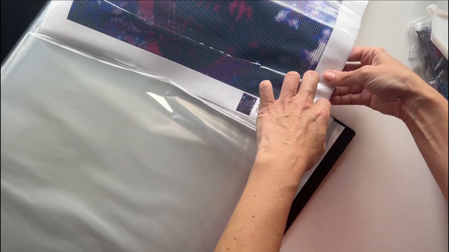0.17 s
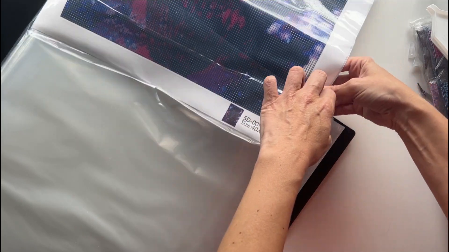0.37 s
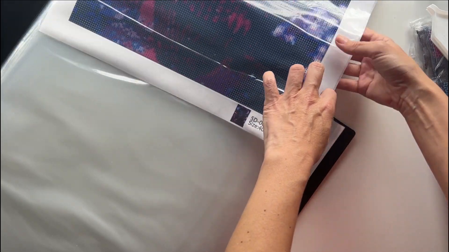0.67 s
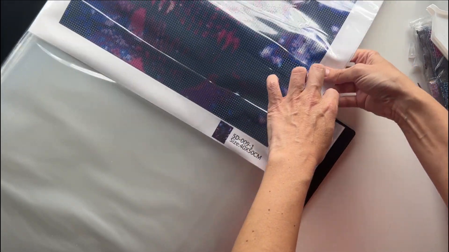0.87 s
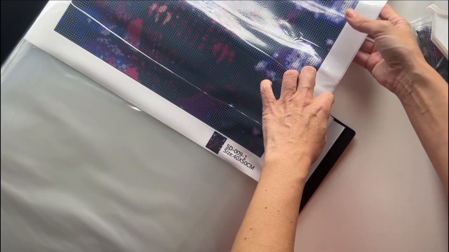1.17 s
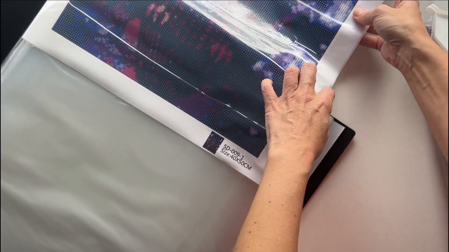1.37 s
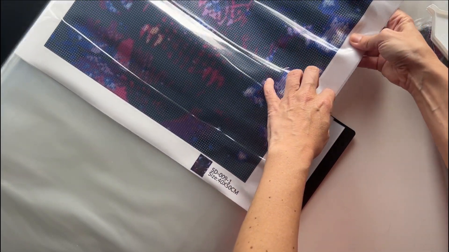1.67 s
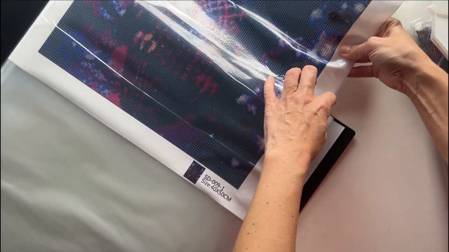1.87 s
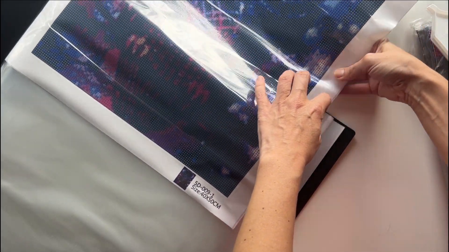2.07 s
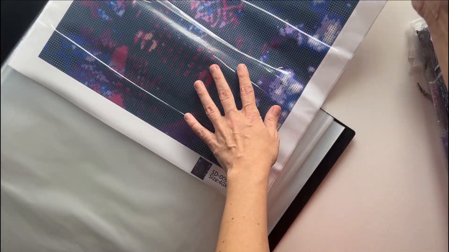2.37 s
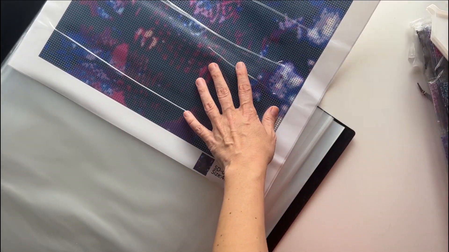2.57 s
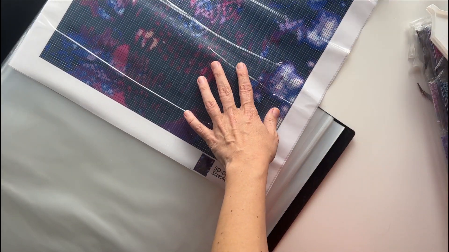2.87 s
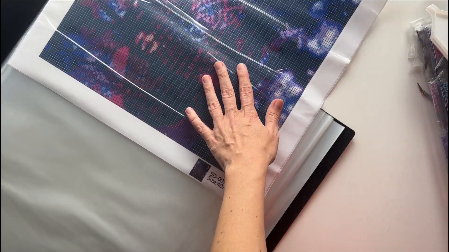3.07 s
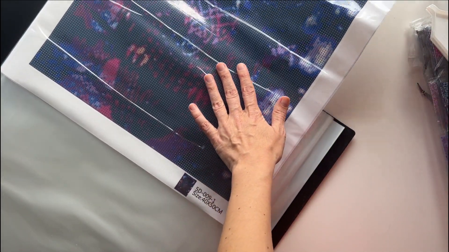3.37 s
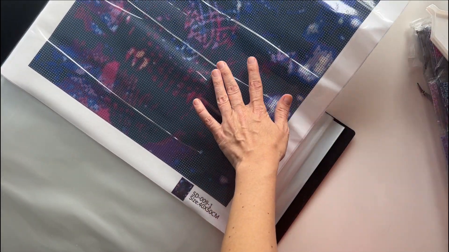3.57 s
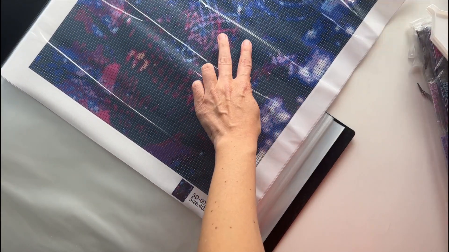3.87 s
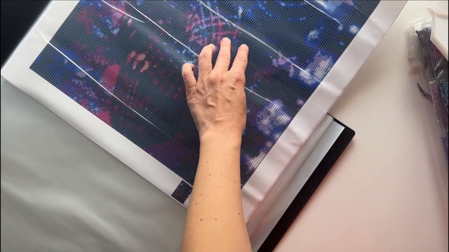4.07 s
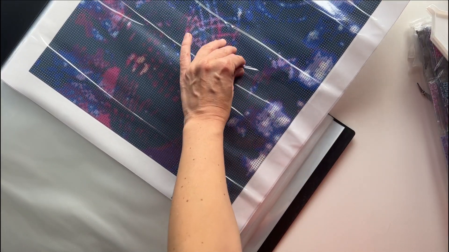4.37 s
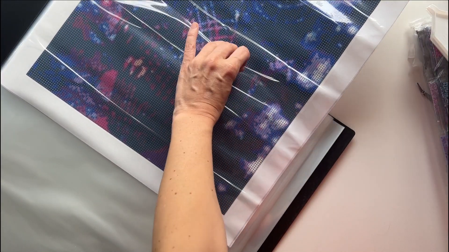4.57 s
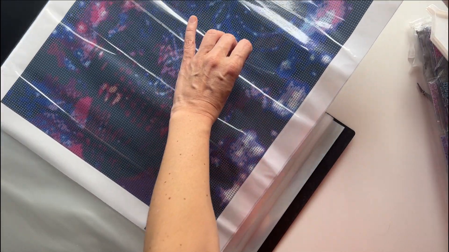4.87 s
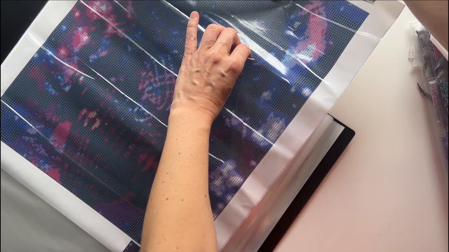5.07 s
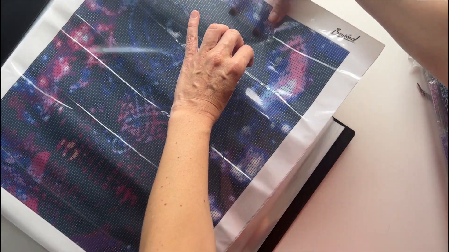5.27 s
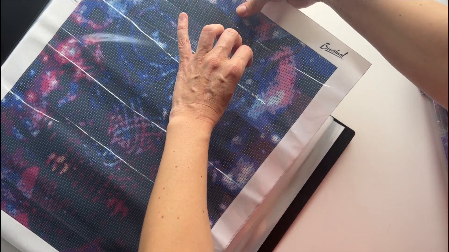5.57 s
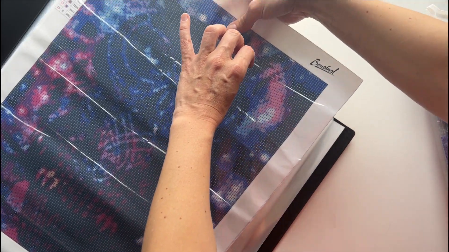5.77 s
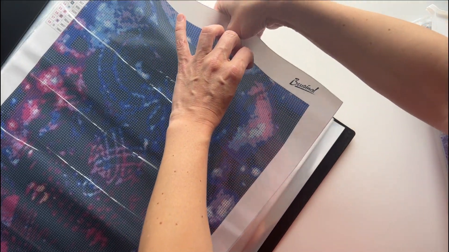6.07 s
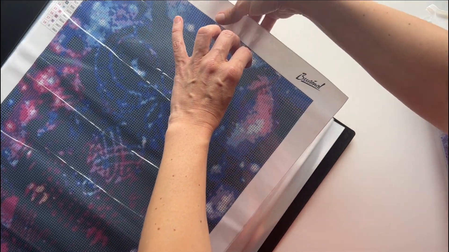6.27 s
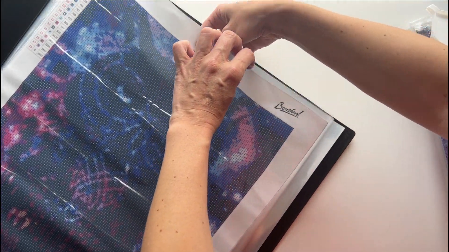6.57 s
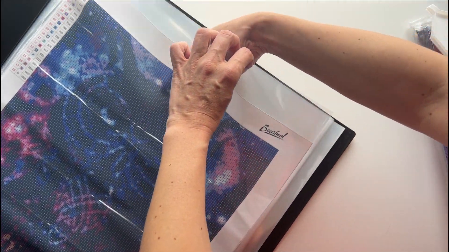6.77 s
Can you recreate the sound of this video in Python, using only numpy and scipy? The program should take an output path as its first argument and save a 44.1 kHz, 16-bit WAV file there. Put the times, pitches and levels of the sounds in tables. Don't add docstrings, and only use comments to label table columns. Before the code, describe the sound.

Plastic film rustles and pops irregularly, dense at first, then sparser with faint creaking slides and soft palm rubbing. Light woody knocks come from the folder on the desk. A loud stiff clack and its quickening, dulling bounces stand out just past the middle. Afterward come thin ticks, one broad loud hissing slide, and small crinkles. Indoors, very close, little echo, low faint room tone.

```python
import sys
import numpy as np
from scipy import signal
from scipy.fft import rfft, irfft
from scipy.io import wavfile
from scipy.ndimage import uniform_filter1d, map_coordinates

SR = 44100
rng = np.random.default_rng(int(sys.argv[2]) if len(sys.argv) > 2 else 0)


def invert_db(x):
    u = np.asarray(x, float) / 20
    return 10 ** u


def to_wav(s):
    ch = np.atleast_2d(s).T
    pcm = np.round(np.clip(ch, -1, 1) * 32767)
    wavfile.write(sys.argv[1], SR, pcm.astype(np.int16))


N = 304290

# f/Hz, density/dB
HISS = [(2650, -46), (4500, -5), (7960, 1.5), (10600, -1), (13400, -5.5), (15200, -0.5), (16200, -24.5),
        (16500, -88)]
RUSTLE = [(650, -101), (1100, -15), (1440, -12.5), (1730, -11), (1910, -7.5), (2750, -3.5), (4870, -8),
          (5500, -7.5), (7150, -27), (12100, -120)]
COVER = [(200, -40), (300, -9), (400, -1.5), (600, -1.5), (900, 1.5), (1300, 3.5), (1900, -2), (3000, -9.5),
         (6000, -41.5)]
DESK = [(20, -33.5), (55, -31), (95, -6), (115, -7), (145, 5), (180, -8), (232, 2), (270, -4.5),
        (340, -12.5), (450, -5.5), (800, -19), (2000, -58)]
# f/Hz, density/dB
FLOOR = [(20, -24), (45, -1.5), (140, -1.5), (300, -3.5), (900, -9.5), (2700, -35), (8000, -46.5),
         (16000, -40)]
FLOOR_DB = -64
# f/Hz, left-right likeness/1
LIKENESS = [(60, .96), (170, .993), (550, .78), (4200, .88), (5050, .6), (5900, .89), (11500, .82),
            (13000, .55)]
# f/Hz, lead of the left/rad
PORT_LEAD = [(20, 0), (4220, -.15), (4740, -1.2), (5430, -5.8), (5800, -6.28), (16000, -6.28)]

# t/s, hiss level/dB, weight/dB
CREEP = [(0, -50, -38.5), (.09, -58.5, -52), (.68, -52, -33), (1.05, -45.5, -43), (1.5, -50, -36),
         (1.64, -50.5, -48.5), (2.1, -47, -32), (2.5, -44.5, -39.5), (2.62, -59.5, -39.5), (2.93, -50, -67),
         (3.501, -51, -40), (4.2, -56.5, -28), (4.33, -65, -42), (4.42, -49, -36.5), (4.75, -42.5, -44),
         (5.6, -57.5, -45.5), (6.3, -55, -52.5), (6.9, -42.5, -46)]
# t/s, length/s, hiss level/dB, crumpling/dB
SHOVES = [(0.131, 0.082, -41.5, -1), (0.253, 0.1, -29.5, -4), (0.231, 0.019, -50, 11),
          (2.962, 0.053, -39.5, -2), (3.075, 0.035, -41, -1), (3.154, 0.034, -39, -2),
          (3.228, 0.059, -30.5, -6.5), (4.353, 0.035, -45.5, -5), (3.551, 0.14, -44.5, 0.5),
          (4.178, 0.041, -42, -11), (4.879, 0.0091, -29.5, -10), (4.895, 0.087, -20, -7),
          (4.981, 0.41, -22, -3.5), (5.4, 0.15, -49, 5.5), (5.767, 0.051, -40.5, -5),
          (5.999, 0.0071, -33.5, -22), (6.058, 0.053, -39, -2.5), (6.132, 0.078, -50.5, 6),
          (6.414, 0.19, -39, -7), (6.613, 0.39, -40, -5)]
# t/s, length/s, final hiss level/dB, crumpling/dB
PULLS = [
    (0.743, 0.2, -35.5, -1),
    (1.427, 0.19, -35, -7),
    (2.25, 0.278, -40, -5.5),
    (4.445, 0.13, -41.5, 1),
]
# t/s, length/s, top hiss level/dB, crumpling/dB
SWEEPS = [(0.392, 0.058, -22, -4), (0.93, 0.016, -21.5, -6), (1.806, 0.12, -24, -6.5),
          (1.94, 0.11, -31, -4.5), (3.057, 0.10, -30.5, -4), (3.289, 0.1, -29, -3.5),
          (4.773, 0.064, -16.5, -5.5), (5.616, 0.14, -38, -7), (5.806, 0.13, -35, -2),
          (5.937, 0.12, -47, 2.5), (6.346, 0.058, -34.5, -4.5), (6.526, 0.13, -35.5, -11.5)]
# t/s, length/s, hiss level/dB, crumpling/dB
SCUFFS = [
    (3.884, 0.018, -46.5, 18),
    (3.976, 0.005, -34.5, 4),
]
# t/s, length/s, rumble level/dB
PRESSES = [(0.113, 0.042, -45.5), (0.448, 0.087, -28.5), (0.851, 0.15, -27), (1.043, 0.024, -42),
           (1.31, 0.22, -51.5), (1.764, .3, -49.5), (2.108, 0.07, -29), (2.957, 0.09, -43),
           (3.258, 0.19, -49), (3.588, 0.1, -48.5), (3.916, 0.27, -30), (4.378, 0.43, -46.5),
           (4.816, 0.12, -43), (5.01, 0.21, -43.5), (5.86, 0.1, -55.5), (6.065, 0.14, -56.5)]
STEP = 32
ATTACK_DB_PER_S, STOP_DB_PER_S, SAG_DB_PER_S = 1093.5, 750, 35.5
SETTLE_DB, SETTLE_DB_PER_S = -9, 105.5
PULL_GAIN_DB, SCUFF_ATTACK_DB_PER_S = 13, 4000
SWEEP_SWELL_DB, SWEEP_TOP_SHARE, SWEEP_FADE_DB = 10, 0.65, 6
DESK_STOP_DB_PER_S, DESK_SAG_DB_PER_S = 222, 22.5
CREEP_CRUMPLE_DB, DESK_IDLE_DB = -3.5, -68
COVER_FOLLOWS, DESK_FOLLOWS = 1, 0.67
EVEN_S = 0.031
PATCH_DB, PATCH_S, PATCH_OCTAVES = 2, .06, 0.2873

# t/s, peak level/dB, fold resonance f/Hz
BUCKLES = [(.0927, -38, 1090), (.1075, -32, 1080), (.1275, -15, 3450), (.2493, -11, 3040),
           (.2686, -9.5, 2640), (.2805, -18, 3100), (.2967, -13, 2850), (.3129, -8, 3450),
           (.322, -11, 2360), (.3935, -11.5, 1980), (.4145, -3, 2210), (.4352, -16, 1940),
           (.5138, -28, 1120), (.9384, -26, 2000), (2.0345, -10.5, 810), (2.116, -14, 1490),
           (3.3107, -19.5, 2390), (3.442, -20.5, 2190), (3.5274, -38, 1570), (4.2145, -77, 1360),
           (4.3797, -28.5, 1720), (5.1519, -24, 1210), (5.9242, -19, 2220), (6.1573, -49, 3700),
           (6.186, -20, 4300), (6.2255, -23, 2670), (6.2607, -33, 3140), (6.2718, -35.5, 1240),
           (6.451, -26.5, 4560), (6.762, -16, 3740), (.178, -29, 1510), (.19, -23, 2500),
           (.2111, -44, 1470), (.297, -21, 1560), (.4275, -2.5, 2130), (2.1797, -6.5, 1420),
           (3.487, -31, 1720), (3.8457, -37, 2200), (4.4111, -48, 1710), (5.4482, -27, 1100),
           (5.546, -37, 1120), (5.6114, -39.5, 1495), (6.285, -38, 2500), (6.416, -30.5, 2380),
           (4.8775, -17.5, 1880), (5.226, -31, 2000), (3.968, -37, 1400), (3.9715, -10, 1520),
           (1.9832, -34, 2990), (2.0355, -12, 2700), (2.040, -12.5, 3020), (.937, -19, 2900),
           (.942, -21, 1700), (3.879, -35, 900), (.418, -20, 1700), (5.217, -31, 2800), (4.587, -23, 1400),
           (.5165, -16.5, 2220)]
# t/s, peak level/dB, fold resonance f/Hz
SNAPS = [(.1471, -24, 2600), (.1594, -21.5, 1620), (.2402, -20.5, 1530), (.448, -32, 3500),
         (.4777, -12.5, 1910), (.5592, -21.5, 1230), (1.5, -30, 1770), (2.9553, -36, 2500),
         (3.5838, -15.5, 1920), (3.6248, -12.5, 2370), (3.6436, -19, 940), (3.7518, -27.5, 2180),
         (4.1886, -25.5, 2730), (4.351, -41, 1290), (4.364, -30.5, 3400), (4.5612, -21.5, 1580),
         (4.6162, -26.5, 1440), (4.6557, -28, 2470), (4.7565, -20, 1640), (4.8949, -33, 970),
         (5.7897, -23, 4560), (5.877, -21, 3970), (6.0654, -14.5, 3730), (6.3756, -16.5, 2200),
         (6.6254, -33, 2840), (6.7725, -21.5, 2970), (.708, -30, 1230), (5.943, -32, 2500),
         (3.5484, -12, 2180), (1.9567, -18, 2650), (5.9977, -34, 1200), (.2305, -29, 1900),
         (.3805, -25, 2230), (3.1084, -22.5, 2410), (3.2261, -42, 2960), (3.3393, -34, 1630),
         (2.9602, -27, 2530), (1.7323, -39, 2160), (1.8051, -26, 3020), (1.8245, -24, 2640),
         (4.4315, -28, 2550), (4.7029, -33, 1000), (4.7753, -23, 2450), (5.2751, -38, 2960),
         (6.0555, -38, 2800), (.6206, -25.5, 2330), (.7588, -29, 1550), (.8436, -24, 1380),
         (5.905, -27, 3000)]
# t/s, peak level/dB, fold resonance f/Hz
TICKS = [(.7889, -30.5, 2870), (.815, -28, 2800), (.953, -20, 3000), (.9964, -37, 1090),
         (1.5927, -26.5, 1510), (1.725, -37, 3060), (1.7608, -30.5, 2000), (1.9578, -23.5, 1390),
         (3.172, -23, 4470), (3.462, -34, 3000), (3.497, -53, 3060), (3.5515, -23.5, 1580),
         (3.664, -46, 2800), (3.7394, -42, 2263), (6.146, -47, 2520), (6.272, -45, 2500),
         (3.1912, -28, 3510), (4.425, -32.5, 1420), (4.4913, -32, 1150), (4.8949, -23, 2000),
         (5.5194, -29, 2730), (5.999, -37, 2740), (6.0665, -29, 4200), (6.003, -42, 2700),
         (5.94, -28.5, 2500), (6.084, -39, 3030), (6.5271, -27.5, 2980), (1.2, -35, 3300),
         (.8475, -46, 2500), (5.153, -29, 2000), (.106, -38.5, 2500)]
# f/Hz, level/dB, t60/s
FILM_RINGS = [(7310, 11, 0.00077), (9900, 15, 0.00083)]
BUCKLE_BRIGHT_DB, SNAP_BRIGHT_DB, TICK_BRIGHT_DB = -18, -2.5, 6
BUCKLE_FLUTTER_S, SNAP_FLUTTER_S, TICK_FLUTTER_S = .0011, .002, .0015
FLUTTER_SHARE, BRIGHT_LAG_S = .33, .001
ECHO_S, ECHO_SHARE = .0029, .4
CRACKLE_PER_S, CRACKLE_CYCLES, CRACKLE_DB = 800, 16, -8

# t/s, level/dB, resonance f/Hz
RUBS = [
    [(1.08, -94, 1765), (1.15, -41, 2000), (1.23, -35, 1900), (1.30, -36, 1450), (1.36, -38, 1474),
     (1.5, -53, 1700), (1.62, -55, 1530)],
    [(1.1, -55, 800), (1.15, -41, 815.6), (1.2, -44, 850), (1.26, -40, 950), (1.33, -31, 801),
     (1.37, -43, 521), (1.47, -43, 594), (1.58, -39.5, 840)],
    [(2.24, -47, 1417), (2.46, -44, 1412), (2.6, -41.5, 1954), (2.75, -39, 1840), (2.94, -51, 1885)],
    [(4.88, -34, 799), (4.91, -17.5, 803), (4.97, -20, 900), (5.01, -18.5, 699.4), (5.07, -25, 903.5),
     (5.19, -21.5, 1050), (5.22, -30, 900), (5.35, -30, 1115), (5.53, -38.5, 793)],
    [(1.77, -43, 600), (1.82, -45, 620), (1.9, -28, 650), (1.95, -38, 600)],
    [(.29, -28, 650), (.33, -36, 680), (.39, -47, 700)],
    [(4.9, -24, 1504), (4.98, -30, 1648), (5.09, -22, 1750), (5.18, -41, 1597), (5.3, -61, 1527),
     (5.41, -37, 2020), (5.46, -58, 2010)],
]
RUB_WIDTH = .28
# t/s, peak level/dB, pitch f/Hz, t60/s
KNOCKS = [(0.297, -24.5, 650, 0.036), (0.683, -32, 441, 0.057), (1.042, -22.5, 156, 0.043),
          (1.7764, -17, 577, 0.018), (1.897, -23, 780, 0.039), (2.036, -18, 826, 0.02),
          (.708, -30, 830, .02), (2.102, -19, 510, 0.028), (2.1799, -13, 790, 0.016),
          (2.194, -28, 724, 0.02), (2.538, -37.5, 387, 0.035), (2.954, -30.5, 432, 0.049),
          (2.988, -58, 216, 0.015), (3.689, -25.5, 535, .02), (3.695, -27, 382, 0.02),
          (3.698, -22.5, 256, .035), (1.325, -37.5, 620, .03), (5.922, -28.5, 910, 0.01),
          (6.067, -35.5, 800, 0.02)]
# t/s, peak level/dB, length/s
THUMPS = [
    (0.46, -54, .02),
    (0.99, -45, 0.0067),
    (2.12, -38, 0.013),
    (2.6, -36, 0.021),
    (2.95, -54, 0.03),
    (3.888, -39, 0.0057),
    (4.156, -48.5, 0.028),
    (4.7, -48, 0.022),
    (1.1, -51, .02),
]
# t/s, peak level/dB, contact cut f/Hz
BOUNCES = [
    (3.886, 6.5, 3300),
    (3.977, -0.5, 2760),
    (4.037, -5, 1900),
    (4.078, -6.5, 1600),
    (4.108, -9.5, 1620),
    (4.129, -14, 1490),
    (4.146, -19.5, 1290),
    (4.164, -30, 1100),
    (4.18, -24, 1000),
]
# f/Hz, level/dB, t60/s, left-right/dB
PART = [(137, -19, .2, -8), (225, -9.5, 0.044, -4.5), (446, -6, 0.031, 2.5), (597, 10, 0.02, -5),
        (638, 2, 0.016, 15), (846, -3.5, 0.04, 12.5), (1037, 4, 0.014, 12), (1178, 0, 0.033, -10),
        (1320, -0.5, 0.039, -3.5), (1650, 4.5, 0.022, -8), (2240, -4, 0.014, 1.5), (3660, -22, .08, -5.5),
        (2720, -13, .012, 0), (606, -32.5, 1.0, 4)]
# f/Hz, t60/s
ROOM_T60 = [(100, 0.37), (1000, 0.15), (4000, 0.06), (16000, 0.3)]
LOW_CUT_HZ = 102

NOTCH_HZ, NOTCH_WIDTH_HZ, NOTCH_DEPTH = 5000, 900, .2
# f/Hz, chance/1
DROPOUTS = [(12200, 0), (12600, .45), (12900, .1), (13200, .45), (13600, .06), (14900, .06), (15300, .4),
            (15700, .1)]
# t/s, length/s
TOP_LOST = [
    (.29, .08),
    (.665, .035),
    (1.11, .04),
    (1.62, .08),
    (3.08, .05),
    (4.31, .09),
    (5.77, .03),
    (5.905, .02),
    (6.255, .02),
    (4.27, .03),
]
# f/Hz, chance/1
SIDE_DROPOUTS = [(1500, 0), (1900, .3), (3900, .25), (4200, 0), (5600, 0), (6000, .85), (12000, .78),
                 (14500, .6)]
SIDE_SPARED = .3


def rms_one(x):
    return x / np.sqrt(np.mean(x ** 2) + 1e-20)


def at_hz(points, hz):
    points = np.array(points)
    return np.interp(np.log(hz + 1), np.log(points[:, 0]), points[:, 1])


def drift(rate):
    r = np.exp(-2 * np.pi * rate / SR)
    return rms_one(signal.lfilter([1], [1, -2 * r, r * r], rng.standard_normal(N + SR))[SR:])


def ring(x, hz, t60):
    r, w = invert_db(-60 / (max(t60, .001) * SR)), 2 * np.pi * hz / SR
    return signal.lfilter([0, np.sin(w)], [1, -2 * r * np.cos(w), r * r], x + 1e-18)


def coloured(mid, side, spectrum):
    hz = np.arange(N // 2 + 1) * SR / N
    alike = np.clip(at_hz(LIKENESS, hz), 0, 1)
    both = np.sqrt(1 + alike) * rfft(mid) + np.sqrt(1 - alike) * rfft(side) * [[1], [-1]]
    turn = np.exp(.5j * at_hz(PORT_LEAD, hz) * [[1], [-1]])
    return rms_one(irfft(both * invert_db(at_hz(spectrum, hz)) * turn, N))


def add(out, s, sound):
    i = round(s * SR)
    out[..., i:i + sound.shape[-1]] += sound[..., :N - i]


def room_tone():
    return invert_db(FLOOR_DB) * coloured(*rng.standard_normal((2, N)), FLOOR)


def stroke(start, length, swell_db, top_share, fade_db, attack_db_per_s, stop_db_per_s):
    t = np.arange(0, N, STEP) / SR - start
    after = np.maximum(t - length, 0)
    held_db = np.interp(t / length, [0, np.clip(top_share, .01, .99), 1], [-swell_db, 0, -fade_db])
    release_db = np.maximum(-stop_db_per_s * after, SETTLE_DB - SETTLE_DB_PER_S * after)
    attack_db = attack_db_per_s * np.minimum(t, 0)
    return invert_db(2 * np.maximum(attack_db + held_db + release_db, -150))


def movement():
    steps = np.arange(0, N, STEP)
    s, creep_db, weight_db = np.transpose(CREEP)
    hiss = invert_db(2 * np.interp(steps / SR, s, creep_db))
    rustle = hiss * invert_db(2 * CREEP_CRUMPLE_DB)
    # swell/dB, share of the length at the top, fade/dB, attack/(dB/s)
    sweep_shape = (SWEEP_SWELL_DB, SWEEP_TOP_SHARE, SWEEP_FADE_DB, ATTACK_DB_PER_S)
    moves = [(row, (0, 0, SAG_DB_PER_S * row[1], ATTACK_DB_PER_S)) for row in SHOVES]
    moves += [(row, (PULL_GAIN_DB, 1, 0, ATTACK_DB_PER_S)) for row in PULLS]
    moves += [(row, (0, 0, 0, SCUFF_ATTACK_DB_PER_S)) for row in SCUFFS]
    moves += [(row, sweep_shape) for row in SWEEPS]
    for (start, length, level_db, crumple_db), shape in moves:
        power = invert_db(2 * level_db) * stroke(start, length, *shape, STOP_DB_PER_S)
        hiss = hiss + power
        rustle = rustle + invert_db(2 * crumple_db) * power
    rustle_db = 10 * np.log10(rustle)
    cover_db = np.interp(steps / SR, s, weight_db) + COVER_FOLLOWS * (rustle_db + 40)
    desk = invert_db(2 * (DESK_IDLE_DB + DESK_FOLLOWS * (cover_db + 38.5)))
    for start, length, level_db in PRESSES:
        sag_db = DESK_SAG_DB_PER_S * length
        press = stroke(start, length, 0, 0, sag_db, ATTACK_DB_PER_S, DESK_STOP_DB_PER_S)
        desk = desk + invert_db(2 * level_db) * press
    levels_db = 10 * np.log10(hiss), rustle_db, cover_db, 10 * np.log10(desk)
    return [np.interp(np.arange(N), steps, level_db) for level_db in levels_db]


def patchy(x):
    hz, frames, z = signal.stft(x, SR, nperseg=512)
    grid = np.meshgrid(np.log2(1 + hz / 100) / PATCH_OCTAVES, frames / PATCH_S, indexing="ij")
    field = map_coordinates(rng.standard_normal((64, 400)), grid, order=1, mode="wrap")
    return signal.istft(z * invert_db(PATCH_DB * field), SR, nperseg=512)[1][:, :N]


def slide():
    levels_db = movement()
    clumps = np.clip(drift(45), -2, 1.3)
    sizes = invert_db(4.5 * np.minimum(rng.exponential(1, N), 3))
    slips = sizes * (rng.random(N) < 900 * invert_db(2.5 * clumps) / SR)
    grains = rms_one(signal.lfilter([1], [1, -.93], slips))
    sparse = np.clip(invert_db(-.3 * (levels_db[0] + 34.5)), .4, .85)
    out = 0
    grain_shares, flickers_db = (0.35, 0.29, 0.51, 0.3), (1.2, 1.7, 1.9, 0.83)
    layers = zip(levels_db, (HISS, RUSTLE, COVER, DESK), grain_shares, flickers_db)
    for level_db, spectrum, grainy, flicker_db in layers:
        flicker = invert_db(sparse * flicker_db * (clumps + drift(45)))
        strength = (sparse * grainy * grains + 0.72) * flicker
        mid, side = strength * rng.standard_normal((2, N))
        layer = coloured(mid, side, spectrum)
        if spectrum is DESK:
            power = uniform_filter1d((layer ** 2).mean(axis=0), size=round(EVEN_S * SR))
            layer = layer / np.sqrt(1.7 + power)
        out = out + invert_db(level_db) * layer
    return patchy(out)


def crackle():
    sizes = invert_db(3.5 * np.minimum(rng.exponential(1, N), 3))
    pops = rng.choice([-1, 1], N) * sizes * (rng.random(N) < CRACKLE_PER_S / SR)
    pitches, dealt = np.geomspace(1250, 4400, 10), rng.integers(0, 10, N)
    leans_db = rng.normal(0, 1, 10)
    out = 0
    for k, (hz, lean_db) in enumerate(zip(pitches, leans_db)):
        sound = ring(pops * (dealt == k), hz, CRACKLE_CYCLES / hz) * np.sqrt(hz)
        out = out + invert_db(lean_db * np.array([[1], [-1]])) * sound
    return invert_db(movement()[1] + CRACKLE_DB) * rms_one(out)


def snaps():
    out, t = np.zeros((2, N)), np.arange(SR // 16) / SR
    bright = signal.butter(3, [5600, 14000], "band", fs=SR, output="sos")
    click = np.exp(-t / .00025)
    click = click + ECHO_SHARE * np.roll(click, round(ECHO_S * SR))
    kinds = [(BUCKLES, BUCKLE_BRIGHT_DB, BUCKLE_FLUTTER_S),
             (SNAPS, SNAP_BRIGHT_DB, SNAP_FLUTTER_S),
             (TICKS, TICK_BRIGHT_DB, TICK_FLUTTER_S)]
    creases = [(*row, *kind) for rows, *kind in kinds for row in rows]
    noises = rng.standard_normal((len(creases), 3, len(t)))
    for (s, peak_db, hz, bright_db, flutter_s), noise in zip(creases, noises):
        flutter = FLUTTER_SHARE * np.exp(-t / flutter_s) * invert_db(5.5 * np.clip(noise[2], -2, 1.2))
        burst = 1.6 * click + (click + flutter) * (noise[0] + 0.25 * noise[1] * [[1], [-1]])
        fold = burst + 0.91 * ring(burst, hz, 2.5 / hz)
        fold = fold - 0.28 * ring(burst, 1.746 * hz, 10.0 / hz)
        fold = fold + 0.043 * ring(burst, 0.74 * hz, 2.7 / hz)
        wide = signal.butter(2, [.62 * hz, min(2.75 * hz, 4800)], "band", fs=SR, output="sos")
        body = signal.sosfilt(wide, fold)
        modes = sum(invert_db(db - 7) * ring(burst, mode_hz, t60) for mode_hz, db, t60 in FILM_RINGS)
        crack = signal.sosfilt(bright, burst + modes)
        add(out, s, invert_db(peak_db) * body / abs(body).max())
        add(out, s + BRIGHT_LAG_S, invert_db(peak_db + 3.5 + bright_db) * crack / abs(crack).max())
    return out


def rub():
    t, out = np.arange(N) / SR, np.zeros((2, N))
    white = rng.standard_normal((2, 2, N))
    for s, level_db, hz in map(np.transpose, RUBS):
        slow = signal.sosfilt(signal.butter(2, RUB_WIDTH * hz.mean(), fs=SR, output="sos"), white)
        phase = 2 * np.pi * np.cumsum(np.interp(t, s, hz)) / SR
        carrier = np.cos(phase + [[0], [np.pi / 2]])
        mid, side = (slow * carrier).sum(axis=1)
        fade = np.clip(np.minimum(t - s[0], s[-1] - t) / 0.024, 0, 1)
        band = rms_one(mid + 0.61 * side * [[1], [-1]])
        out += fade * invert_db(np.interp(t, s, level_db) - 11.0) * band
    out = out * invert_db(3.1 * drift(12))
    return signal.sosfilt(signal.butter(3, 330, "high", fs=SR, output="sos"), out)


def knocks():
    out, t = np.zeros(N), np.arange(SR // 5) / SR
    overtones = [(.75, 0.02), (1, 1), (1.4, 0.38), (1.9, 0.43), (2.6, 0.55), (3.6, 0.54)]
    noises = rng.standard_normal((len(KNOCKS), len(t)))
    for (s, peak_db, hz, t60), noise in zip(KNOCKS, noises):
        blow = np.exp(-((t - .001) / 0.00019) ** 2) + 0.033 * noise * np.exp(-t / 0.0045)
        sound = sum(share * ring(blow, ratio * hz, t60 / ratio) for ratio, share in overtones)
        sound = signal.sosfilt(signal.butter(2, .5 * hz, "high", fs=SR, output="sos"), sound)
        add(out, s, invert_db(peak_db) * sound / abs(sound).max())
    return out


def thumps():
    t, out = np.arange(N) / SR, 0
    for s, db, length in THUMPS:
        x = (t - s) / length
        out = out + invert_db(db - 1.5) * x * np.exp(-x ** 2)
    return out


def spread_share(hz):
    return min(1, hz / 450) ** 2


def bounces():
    out, t = np.zeros((2, N)), np.arange(SR * 2 // 3) / SR - .012
    after = np.maximum(t, 0)
    spreads = rng.standard_normal((len(BOUNCES), len(PART)))
    noises = rng.standard_normal((len(BOUNCES), len(t)))
    for (s, peak_db, cut_hz), spread, noise in zip(BOUNCES, spreads, noises):
        scuff = .025 * np.exp(-abs(t) / 0.0027)
        rattle = noise * np.where(t < 0, scuff, 0.22 * np.exp(-after / 0.016))
        crack = noise * (t > .002) * (np.exp(-after / 0.0014) + 0.05 * np.exp(-after / 0.0065))
        band = signal.butter(2, [900, min(6.7 * cut_hz, 16000)], "band", fs=SR, output="sos")
        crack = signal.sosfilt(band, crack)
        sound = 0
        for (hz, mode_db, t60, pan_db), chance in zip(PART, spread):
            arrival = np.exp(-((t - 2.64 / hz) * hz / 0.63) ** 2)
            contact = arrival * np.sin(2 * np.pi * hz * t) * hz / 1000
            contact_db = -10 * np.log10(1 + (hz / cut_hz) ** 6)
            lean_db = spread_share(hz) * pan_db / 2 * np.array([[1], [-1]])
            heard = invert_db(mode_db + contact_db + 0.6 * chance + lean_db)
            landed_hz = hz * (1 + 0.035 * np.sin(7 * chance))
            sound = sound + heard * ring(contact + rattle, landed_hz, t60)
        sound = sound / abs(sound).max() + 0.34 * (cut_hz / 2500) ** 2 * crack
        add(out, s - .013, invert_db(peak_db) * sound)
    return out


def room(x):
    t, tail = np.arange(SR // 2) / SR, 0
    for low in 60 * 2. ** np.arange(8):
        centre = low * np.sqrt(2)
        band = signal.butter(2, [low, 2 * low], "band", fs=SR, output="sos")
        alike = np.clip(at_hz(LIKENESS, centre), 0, 1) ** 2
        mid, side = signal.sosfilt(band, rng.standard_normal((2, len(t))))
        both = np.sqrt(1 + alike) * mid + np.sqrt(1 - alike) * side * [[1], [-1]]
        tail = tail + both * invert_db(-60 * t / at_hz(ROOM_T60, centre))
    tail = tail * (1 - np.exp(-(t / 0.00043) ** 2))
    return signal.fftconvolve(x[None], tail / np.sqrt((tail ** 2).sum() / 2), axes=1)[:, :N]


def scene():
    film, blows, drop = snaps(), knocks(), bounces()
    wet = room(invert_db(-6.5) * film[0] + invert_db(-4.0) * blows + invert_db(-9.5) * drop[0])
    low_cut = signal.butter(2, LOW_CUT_HZ, "high", fs=SR, output="sos")
    hits = signal.sosfilt(low_cut, film + blows + drop + wet)
    return slide() + crackle() + rub() + hits + invert_db([[-1.5], [1.5]]) * thumps() + room_tone()


def starved(x):
    hz, frames, z = signal.stft(x, SR, nperseg=512)
    band, hold = (hz // 260).astype(int), np.arange(len(frames)) // 8
    draw = rng.random((band.max() + 1, hold.max() + 1))[band][:, hold]
    keep = (draw > at_hz(DROPOUTS, hz)[:, None]) & (hz[:, None] < 15850)
    for start, length in TOP_LOST:
        keep[np.ix_(hz > 13000, (frames > start) & (frames < start + length))] = False
    band, hold = (13 * (hz / 1000) ** .3).astype(int), np.arange(len(frames)) // 11
    draw = rng.random((band.max() + 2, hold.max() + 1))
    chance = at_hz(SIDE_DROPOUTS, hz)[:, None]
    wide = (draw[band][:, hold] > chance) | (draw[-1, hold] < SIDE_SPARED)
    mid = (z[0] + z[1]) / 2
    side = (z[0] - z[1]) / 2 * wide / np.sqrt(1 - chance * (1 - SIDE_SPARED))
    z = mid + side * [[[1]], [[-1]]]
    return signal.istft(z * np.where(keep, 1, .02), SR, nperseg=512)[1][:, :N]


def low_pass(x):
    return signal.sosfilt(signal.butter(12, 16620, fs=SR, output="sos"), x)


def record(dry):
    r, w = np.exp(-np.pi * NOTCH_WIDTH_HZ / SR), 2 * np.pi * NOTCH_HZ / SR
    poles = [1, -2 * r * np.cos(w), r * r]
    notched = signal.lfilter([(1 - r * r) / 2, 0, (r * r - 1) / 2], poles, dry)
    x = dry - NOTCH_DEPTH * notched
    x = 1.03 * np.tanh(x / .92)
    mix = starved(x)
    return low_pass(mix)


dry = scene()
out = record(dry)
to_wav(out)
```